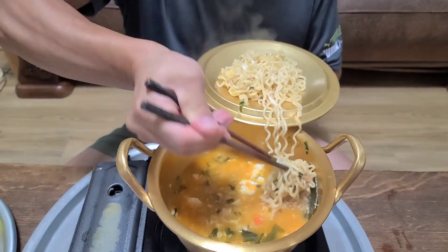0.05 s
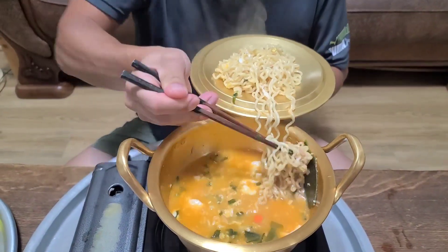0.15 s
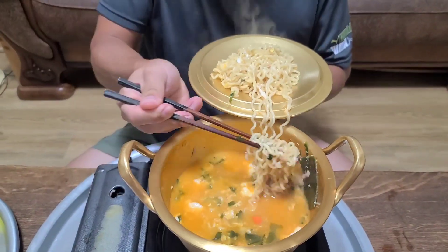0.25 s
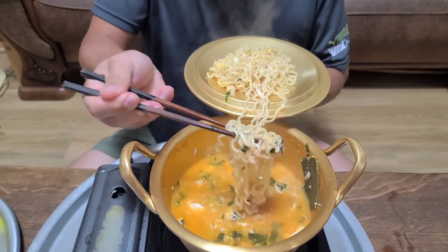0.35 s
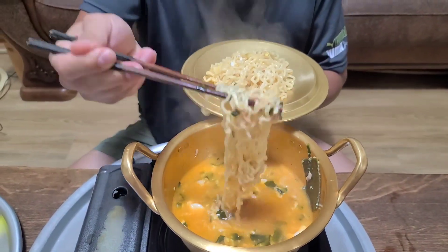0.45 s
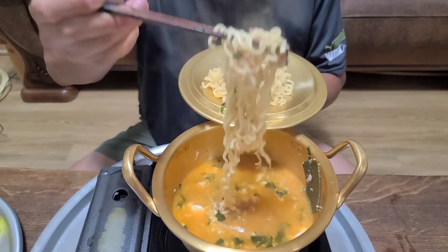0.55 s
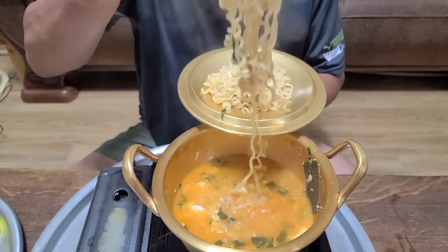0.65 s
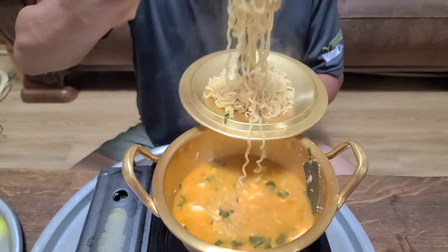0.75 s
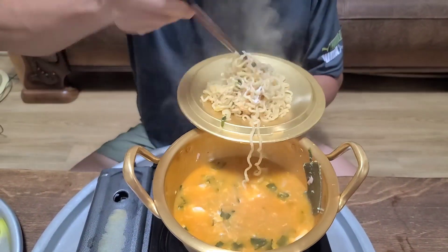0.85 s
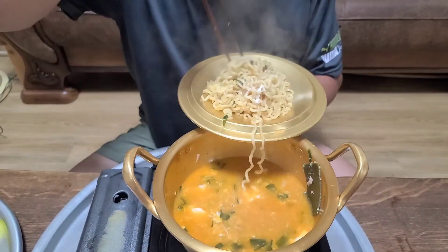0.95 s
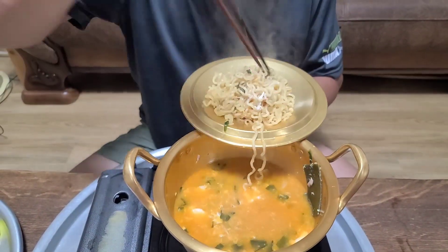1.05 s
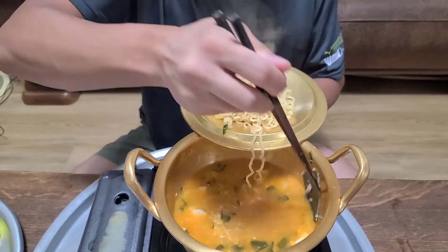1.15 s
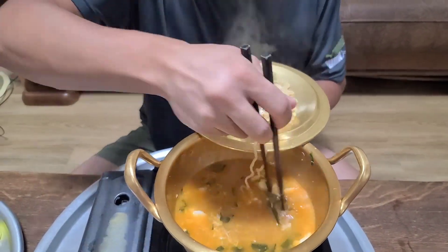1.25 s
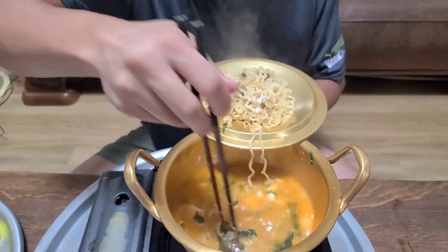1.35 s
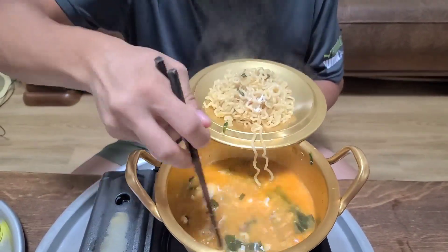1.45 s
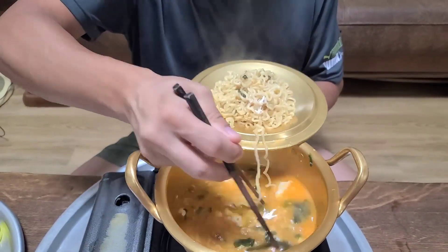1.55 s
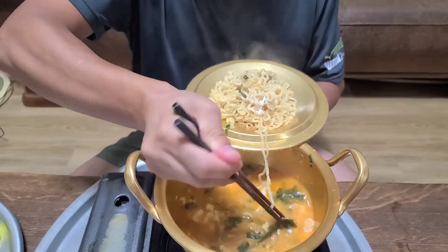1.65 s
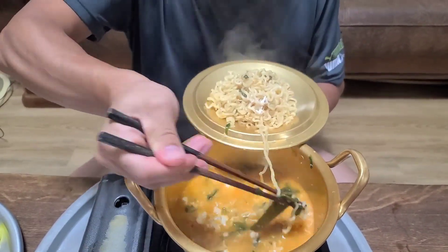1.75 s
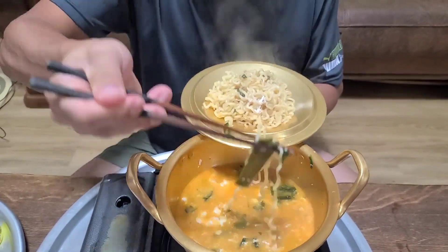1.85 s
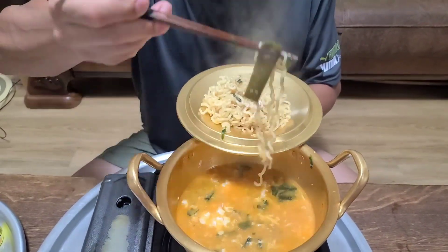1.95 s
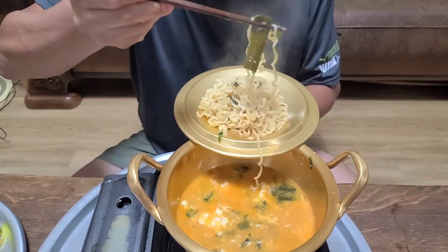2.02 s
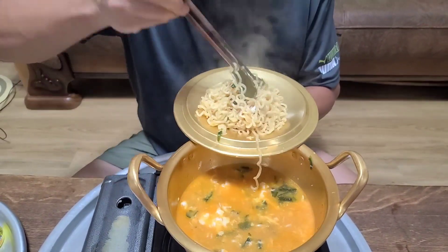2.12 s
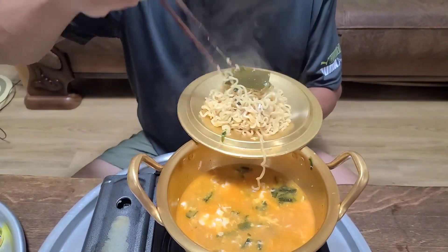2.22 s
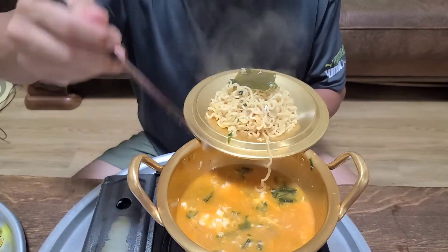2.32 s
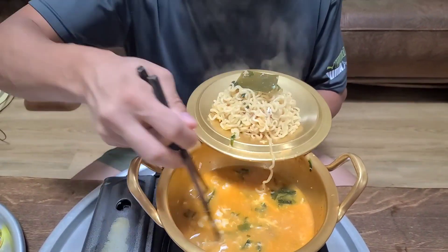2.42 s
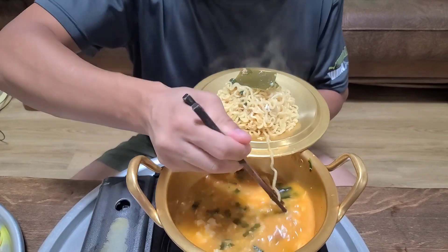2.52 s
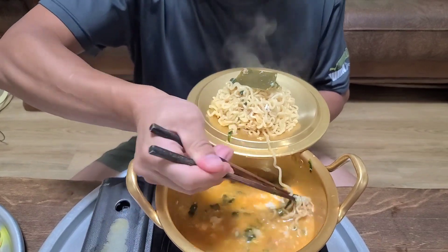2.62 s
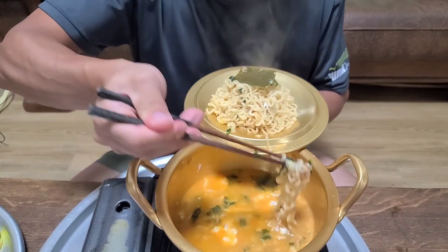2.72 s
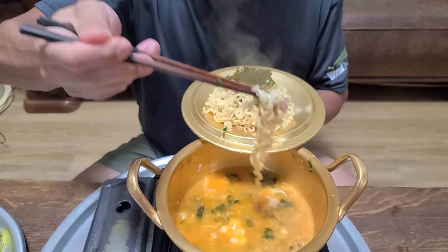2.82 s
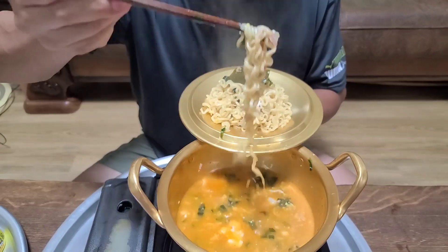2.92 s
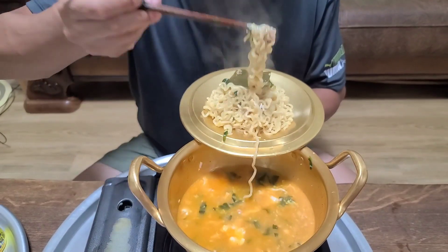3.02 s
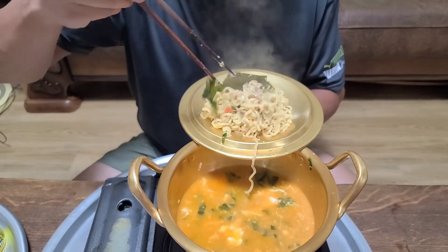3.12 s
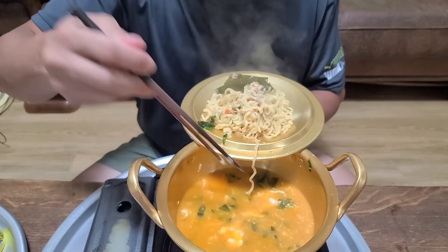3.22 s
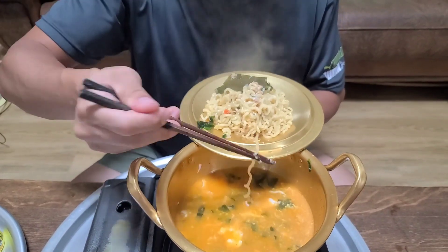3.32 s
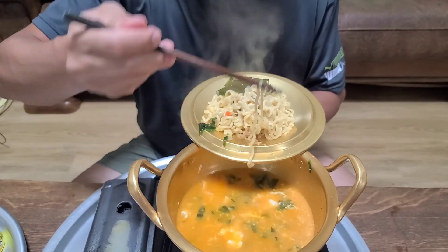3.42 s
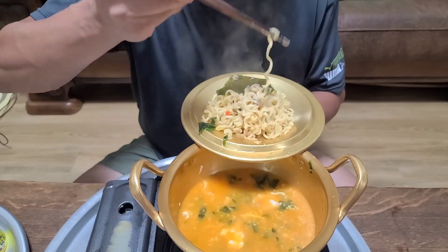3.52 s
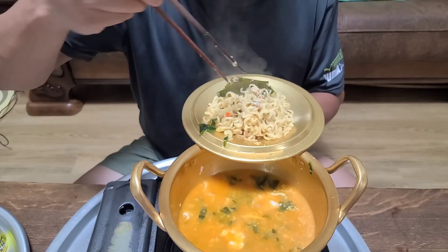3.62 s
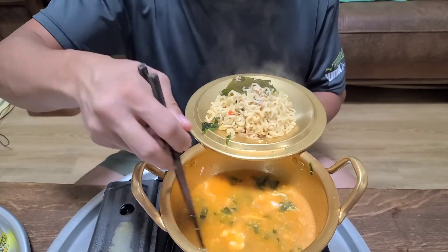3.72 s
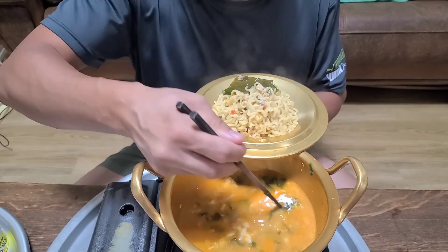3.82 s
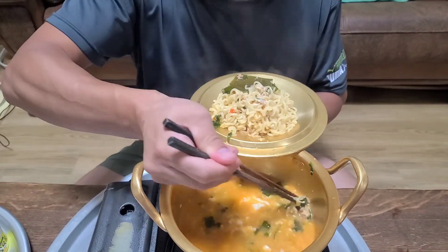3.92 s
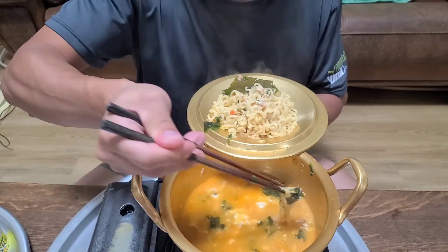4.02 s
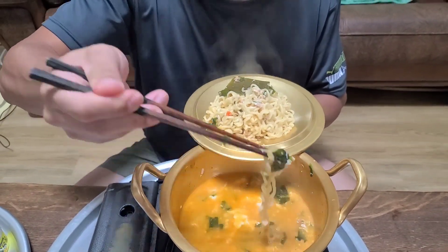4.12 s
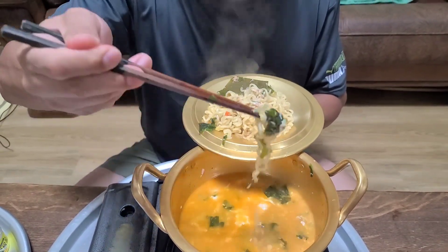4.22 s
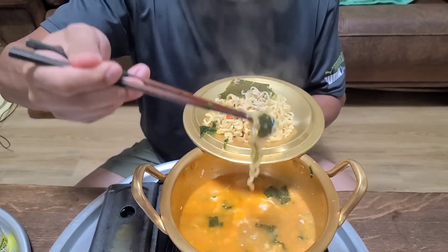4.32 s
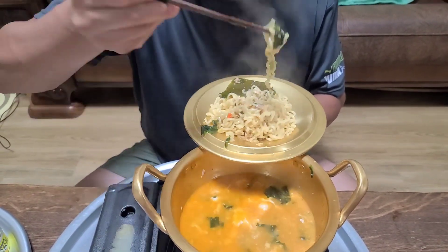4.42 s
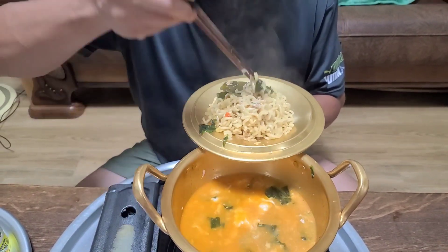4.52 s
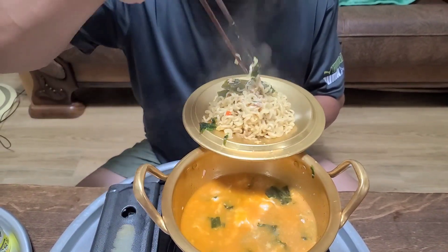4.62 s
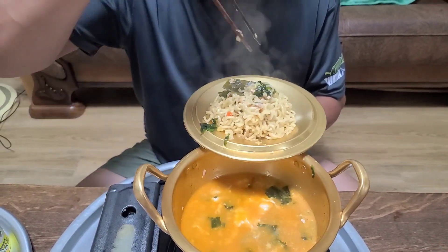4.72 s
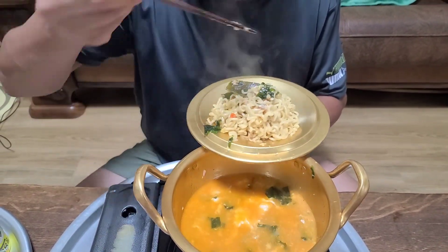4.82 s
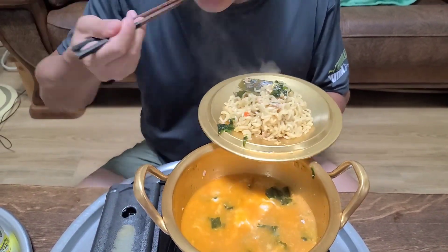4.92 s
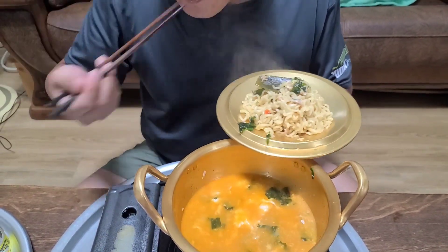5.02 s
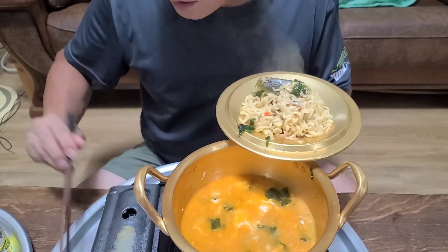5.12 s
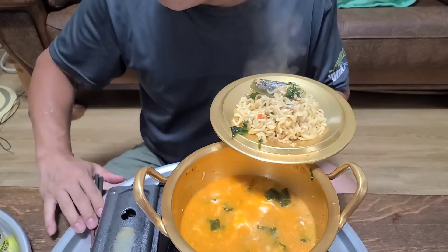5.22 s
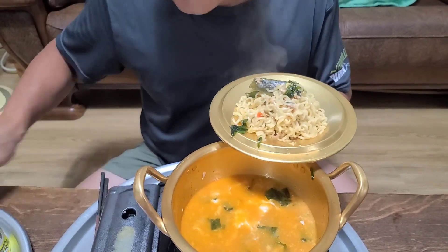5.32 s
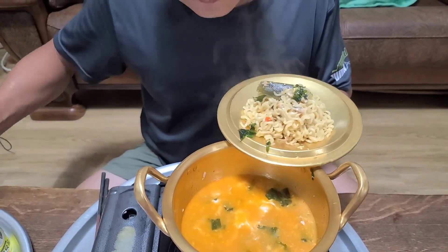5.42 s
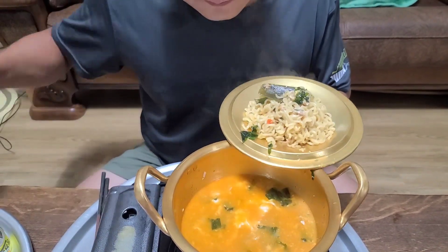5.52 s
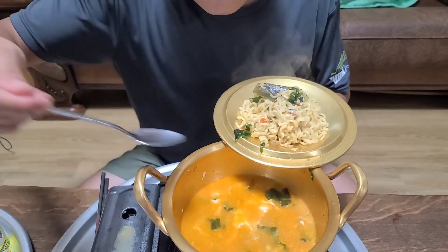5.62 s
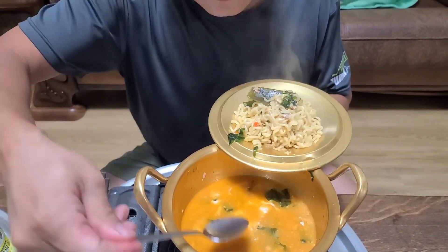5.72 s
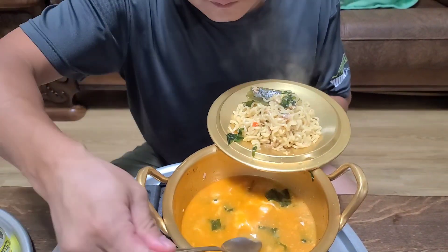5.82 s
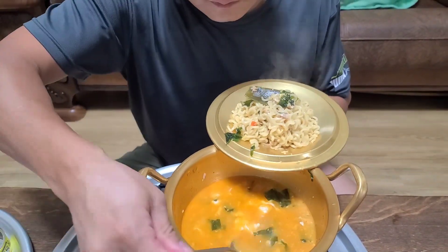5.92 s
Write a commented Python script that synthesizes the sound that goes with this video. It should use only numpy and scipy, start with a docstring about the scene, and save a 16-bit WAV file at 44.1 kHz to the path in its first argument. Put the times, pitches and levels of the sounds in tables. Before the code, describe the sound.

After a nearly silent start, wooden-sounding clicks and short, dry metallic knocks come in small groups as noodles are lifted from soup. Soft wet swishes and blipping drips sit between them. A quiet stretch follows, then chopsticks drop with a bright clatter on steel, and a spoon is picked up with a hard clink. Close stereo microphones, short room echo, soft background hiss.

```python
"""Noodles from a thin metal pot

Close stereo pair in a quiet room: chopsticks fish noodles out of soup and pile them on the pot's lid.
The tips knock on the pot, click on its rim and on each other: decaying modes with a burst of scatter.
The soup sloshes and noodles squelch as swells of grainy noise; drips are short rising tones.
At the end the chopsticks are put down on the stove's steel case and a metal spoon is picked up."""
import sys
import numpy as np
from scipy import signal
from scipy.fft import rfft, irfft
from scipy.io import wavfile
from scipy.ndimage import uniform_filter1d

SR = 44100
rng = np.random.default_rng(int(sys.argv[2]) if len(sys.argv) > 2 else 0)


def materialize(psi):
    """Save the field psi as 16-bit PCM at rate SR to the path in sys.argv[1].

    A 1-D psi becomes a single channel; in a 2-D psi each row is a channel.
    """
    bounded = np.clip(np.atleast_2d(psi).T, -1, 1)
    quanta = np.round(bounded * 32767).astype(np.int16)
    wavfile.write(sys.argv[1], SR, quanta)


N = 262395

# how the lid rings, touched or rubbed: pitch_hz, level_db (relative), t60_s
LID_MODES = [(622, -13, 0.2), (1406, -15.5, 0.13), (1220, -6, 0.018), (1630, -3.5, 0.016),
             (3660, -20, 0.049), (6200, -25, .01), (12800, -17, 0.0073)]


def amp(db):
    """Turns decibels into an amplitude factor."""
    return 10 ** (np.asarray(db) / 20)


def unit(x):
    """Scales to rms 1."""
    return x / np.sqrt(np.mean(x ** 2) + 1e-20)


def read(points, hz):
    """Joins (Hz, value) points on a log-frequency axis."""
    f, value = np.transpose(points)
    return np.interp(np.log(hz + 1), np.log(f + 1), value)


def add(mix, s, sound):
    """Lays a stereo sound into the mix at time s."""
    part = mix[:, round(s * SR):][:, :sound.shape[-1]]
    part += sound[..., :part.shape[-1]]


def colour(x, gain):
    """Filters by a gain that is a function of frequency."""
    size = x.shape[-1]
    return irfft(rfft(x) * gain(np.fft.rfftfreq(size, 1 / SR)), size)


def noise_pair(size, same):
    """Two white noises whose likeness is a function of frequency."""
    a, b = rng.standard_normal((2, size))
    shared = colour(a, lambda hz: np.sqrt((1 + np.clip(same(hz), -1, 1)) / 2))
    apart = colour(b, lambda hz: np.sqrt((1 - np.clip(same(hz), -1, 1)) / 2))
    return np.array([shared + apart, shared - apart])


def near_likeness(hz, split_hz=900):
    """Long waves reach both microphones alike, short ones do not."""
    return 1 / (1 + (hz / split_hz) ** 2)


def bands(x):
    """Splits into thud, knock, clack and tick, which add up to the whole again."""
    # borders between the four registers: edge_hz
    band_edges = [800, 2300, 5000]
    below = [colour(x, lambda hz: 1 / (1 + (hz / edge) ** 6)) for edge in band_edges]
    return np.diff([0 * x, *below, x], axis=0)


def scatter(modes, t, t60, treble_loss=0.33):
    """Nearby metal throws a blow back: a dense burst of its broad colour, the treble dying first."""
    def tint(f):
        ends = f / (f + 150) / np.hypot(1, (f / 11000) ** 2)  # softens both ends of the spectrum
        return amp(read(np.array(modes)[:, :2], f)) * ends

    burst = colour(noise_pair(len(t), near_likeness), tint)
    # t60 is that of the knock register, k = 1
    decays = [amp(-60 * t / t60 * np.exp(treble_loss * (k - 1))) for k in range(4)]
    return unit(sum(band * decay for band, decay in zip(bands(burst), decays)))


def blows(rows, modes, voice_db, contact_s, pan_db, scatter_db, scatter_t60, spread=1.235):
    """Each blow rings decaying modes, with a brief dense burst scattered behind it by nearby metal."""
    lead = SR // 200  # samples of silence ahead of the contact
    out = np.zeros((2, N))
    t = np.maximum(np.arange(SR // 4) - lead, 0) / SR
    hz, mode_db, t60 = np.transpose(modes)[:, :, None]
    register = np.arange(len(voice_db)) - (len(voice_db) - 1) / 2
    for s, db, hardness in rows:
        # every contact point detunes the modes and sends them to each microphone in another phase
        pitch = hz * (1 + 0.01 * rng.standard_normal(hz.shape))
        skew = (1 - near_likeness(hz)) * spread * rng.uniform(0.25, 0.99, hz.shape)
        skew = skew * np.where(hz < 2600, 1, -1)
        phase = rng.uniform(0, 2 * np.pi, hz.shape) + np.array([skew, -skew])
        ring = (amp(mode_db - 60 * t / t60) * np.sin(2 * np.pi * pitch * t + phase)).sum(1)
        hit = unit(ring) + amp(scatter_db) * scatter(modes, t, scatter_t60)
        # the sound builds up while the two things press together
        hit = hit * (1 - np.exp(-(t / contact_s) ** 2))
        # a harder contact tilts the voice towards the treble
        band_db = db + np.array(voice_db) + hardness * register
        # levels hold for the first 10 ms
        levelled = [amp(level) * band / np.std(band[:, lead:lead + SR // 100])
                    for level, band in zip(band_db, bands(hit))]
        add(out, s - lead / SR, sum(levelled))
    return out * amp([[pan_db / 2], [-pan_db / 2]])


def chatter(blow, gap_s, first_db, step_db, softer_db, count):
    """After a hard blow the thing chatters: uneven, duller rebounds, each weaker than the last."""
    s, db, hardness = blow
    rebounds = []
    for k in range(count):
        start = s + gap_s * (k + 1 + rng.uniform(-.25, .25))
        rebounds.append((start, db + first_db + step_db * k, hardness + softer_db))
    return rebounds


def strokes(rows, octaves, grain_db, grains_hz):
    """Short swells of grainy noise around a centre pitch."""
    out = np.zeros((2, N))
    t = np.arange(SR // 4) / SR
    for s, length, level, centre_hz in rows:
        def hump(f):
            distance = np.log2((f + 1) / centre_hz) / octaves
            return np.exp(-.5 * distance ** 2) / np.sqrt(f + centre_hz)

        flicker = colour(rng.standard_normal(len(t)), lambda f: np.exp(-(f / grains_hz) ** 2))
        hiss = noise_pair(len(t), near_likeness) * amp(grain_db * unit(flicker))
        swell = np.sin(np.pi * np.minimum(t / length, 1) ** 0.8)
        add(out, s, amp(level) * unit(colour(hiss, hump)) * swell)
    return out


# In all tables of blows, hardness_db is the gain from one register to the next;
# the level_db of a blow is the one before any group trim in scene().


def pot_wall_taps():
    """The tips tap the thin wall, whose many modes die within hundredths of a second."""
    # tips on the wall: start_s, level_db, hardness_db
    taps = [(1.1615, -40.5, 0), (2.1036, -46.5, .5), (3.1418, -41.5, 2.5), (3.4465, -42, 2.5),
            (3.5125, -52.5, 0.2), (3.6905, -46, .9), (3.824, -56.5, -3), (3.896, -56.5, 0),
            (4.372, -50, -2.5), (4.3808, -46.5, 4)]
    # ringing of the pot: pitch_hz, level_db (relative), t60_s
    modes = [(415, -4, 0.058), (492, -3, 0.059), (727, -9, 0.026), (878, -5.5, 0.024), (1223, -0.5, 0.018),
             (1675, 1, 0.03), (2883, -10, 0.048), (3277, -5.5, 0.02), (3753, -2, 0.014), (4620, -7, 0.012),
             (5350, -13, 0.022), (6310, -5, 0.0091), (7500, -5, 0.0072), (9000, -12.5, 0.0079),
             (10760, -15.5, .008), (13200, -14.5, 0.0089)]
    # strength by register: thud_db, knock_db, clack_db, tick_db
    voice_db = (-2.6, 0.5, -0.5, -9.5)
    return blows(taps, modes, voice_db, contact_s=0.0012, pan_db=-1, scatter_db=-4.5, scatter_t60=0.046)


def pot_bottom_knocks():
    """Both tips strike the bottom, which the soup muffles; the second comes later and more softly."""
    # first tip on the bottom: start_s, level_db, hardness_db
    knocks = [(1.427, -54.5, -0.5), (1.5505, -37.5, -0.3), (2.492, -47.5, -3), (2.5115, -43.5, 0),
              (2.7658, -36, 1.1)]
    # ringing of the bottom under soup: pitch_hz, level_db (relative), t60_s
    modes = [(203, -14.5, 0.049), (398, -7, 0.039), (469, -1.5, 0.053), (560, -10, 0.025), (716, -4, 0.021),
             (926, -9.5, 0.018), (1150, -9, 0.028), (1550, -10.5, 0.011), (2030, -15.5, 0.017),
             (3560, -22, 0.019), (6130, -10, 0.017)]
    # strength by register: thud_db, knock_db, clack_db, tick_db
    voice_db = (2, -6.5, -15.5, -24.5)
    second_s, second_db = .0065, -7
    second_tip = [(s + second_s, db + second_db, hardness) for s, db, hardness in knocks]
    return blows(knocks + second_tip, modes, voice_db, contact_s=0.00087, pan_db=0.8,
                 scatter_db=1.0, scatter_t60=0.029)


def rim_taps():
    """The shafts click on the bare rim; the first blow rattles on in weaker rebounds."""
    # shafts on the rim: start_s, level_db, hardness_db
    taps = [(2.4601, -28, 1.5), (2.5385, -57.5, 5.5), (3.1613, -35.5, -1)]
    # ringing of the rim: pitch_hz, level_db (relative), t60_s
    modes = [(250, -19, 0.049), (532, -7.5, 0.041), (1196, -3.5, 0.029), (1436, 0.5, 0.025),
             (2940, -1, 0.027), (3630, 4, 0.012), (4240, 4, 0.013), (4760, -2.5, 0.01), (5530, -2.5, 0.01),
             (6380, -6.5, 0.01), (7000, -5.5, 0.0073), (8900, -8.5, 0.0068), (10700, -14, .008),
             (11850, -15.5, 0.011)]
    # strength by register: thud_db, knock_db, clack_db, tick_db
    voice_db = (-10, -.5, -3, -3.5)
    rattling = chatter(taps[0], gap_s=.0105, first_db=-18, step_db=-2.5, softer_db=-7, count=3)
    return blows(taps + rattling, modes, voice_db, contact_s=0.00066, pan_db=-0.6,
                 scatter_db=-5, scatter_t60=0.033)


def lid_edge_graze():
    """A shaft grazes the thin edge of the lid and excites its bright modes."""
    # shaft on the edge: start_s, level_db, hardness_db
    grazes = [(1.4828, -44.5, 0)]
    # ringing of the edge: pitch_hz, level_db (relative), t60_s
    modes = [(1330, -5, 0.079), (3600, 1, 0.023), (4700, -7.5, 0.028), (6430, 3, 0.015), (7000, -4, 0.0085),
             (8750, -10, .01), (12000, -19, .008)]
    # strength by register: thud_db, knock_db, clack_db, tick_db
    voice_db = (-19, -5.5, -4, 2)
    return blows(grazes, modes, voice_db, contact_s=0.00095, pan_db=-0.5, scatter_db=0.5, scatter_t60=0.017)


def chopstick_pinches():
    """One chopstick clicks on the other, both held in the hand."""
    # chopstick on chopstick: start_s, level_db, hardness_db
    clicks = [(.7153, -47, 1.5), (.732, -62, 0), (1.289, -56, -0.25), (3.3362, -42.5, -0.26),
              (4.32, -62.5, 0.71), (4.976, -63, -0.83)]
    # ringing of a held chopstick: pitch_hz, level_db (relative), t60_s
    modes = [(1200, -8, 0.034), (1735, -5.5, 0.023), (3060, -10, .012), (4070, -9.5, 0.0078),
             (5580, -14, 0.016), (6340, -6, 0.011), (7200, -8, 0.0077), (8040, -7.5, 0.014),
             (11600, -14.5, .01)]
    # strength by register: thud_db, knock_db, clack_db, tick_db
    voice_db = (-13, -12.5, -3, 0)
    return blows(clicks, modes, voice_db, contact_s=0.00093, pan_db=-0.5, scatter_db=-4.0, scatter_t60=.016)


def lid_touch():
    """The lid is touched once; a short contact starts its modes."""
    # touch on the lid: start_s, level_db, hardness_db
    touches = [(3.025, -44, 0)]
    # strength by register: thud_db, knock_db, clack_db, tick_db
    voice_db = (-1, -1.5, -20, -11.5)
    return blows(touches, LID_MODES, voice_db, contact_s=0.00031, pan_db=0, scatter_db=-12, scatter_t60=0.013)


def noodle_on_lid_edge():
    """A noodle dragged over the lid's edge makes its lowest mode sing, a very narrow band of noise."""
    start_s, length_s, level_db = 3.38, .09, -60
    lowest_hz = LID_MODES[0][0]
    return strokes([(start_s, length_s, level_db, lowest_hz)], octaves=.04, grain_db=4.0, grains_hz=150)


def drips(glide=0.04, cycles=2.9):
    """Each drip is a few cycles of a bubble whose pitch creeps up."""
    # drips and small bubbles: peak_s, pitch_hz, peak_db
    bubbles = [(.945, 790, -53.5), (2.513, 1240, -37.5), (2.584, 3370, -53.5), (2.6001, 1320, -39.5),
               (2.614, 1190, -45.5), (2.625, 1000, -45.5), (2.70, 1260, -51), (3.338, 1710, -28),
               (3.873, 1600, -43), (5.092, 1290, -54), (5.4, 1430, -42)]
    out = np.zeros((2, N))
    for s, hz, db in bubbles:
        length = cycles / hz  # time in s from the peak to 1/e of it, on either side
        u = np.arange(-np.pi, np.pi, 1 / (length * SR))
        phase = 2 * np.pi * hz * length * (u + glide * u ** 2) + rng.uniform(0, 1, (2, 1))
        swell = amp(db) * np.exp(-u ** 2)
        add(out, s - np.pi * length, swell * np.sin(phase))
    return out


def sloshes():
    """Wet noodles dragged through the soup and over the lid: broad swells of grainy noise."""
    # drags: start_s, length_s, level_db, centre_hz
    drags = [(1.18, .28, -63, 2100), (1.56, .17, -59.5, 1700), (2.23, .18, -61.5, 3400),
             (2.52, 0.11, -58.5, 503), (3.23, 0.053, -62.5, 2600), (3.895, 0.047, -59, 2190),
             (4.08, 0.077, -60, 2010)]
    return strokes(drags, octaves=1.3, grain_db=3.8, grains_hz=140)


def squelches_and_rim_ringing():
    """Short narrow-band swells: noodles squelching, and at 2.538 s the ringing after a rim tap."""
    # squelches and the one ringing: start_s, length_s, level_db, centre_hz
    swells = [(.43, 0.075, -66, 1550), (.59, 0.15, -66.5, 1180), (1.265, 0.024, -57, 1280),
              (2.538, 0.03, -54, 3660), (2.749, .02, -49, 550), (3.79, 0.039, -61, 1350),
              (5.02, 0.028, -62, 1260)]
    return strokes(swells, octaves=0.24, grain_db=2.5, grains_hz=150)


def tip_touches():
    """The tips touch the stove and the loosely held chopsticks ring."""
    # tips on the stove: start_s, level_db, hardness_db
    touches = [(5.206, -54.5, 1.4), (5.2588, -32.5, 0.52), (5.268, -31.5, -1.3)]
    # ringing of a loose chopstick: pitch_hz, level_db (relative), t60_s
    modes = [(188, -21, .05), (1423, -6, 0.03), (2350, -2, .012), (2620, -4, 0.03), (3600, -0.5, 0.016),
             (4000, -2.5, 0.015), (5300, -7, .014), (6800, -11.5, 0.013), (8900, -17, 0.0086)]
    # strength by register: thud_db, knock_db, clack_db, tick_db
    voice_db = (-15, -5.5, -1.5, -7)
    return blows(touches, modes, voice_db, contact_s=.0006, pan_db=-.5, scatter_db=-6, scatter_t60=0.026)


def chopstick_drops():
    """Both shafts fall flat on the stove's steel case, which rings while they settle in rebounds."""
    # shafts on the stove: start_s, level_db, hardness_db
    drops = [(5.3148, -20.5, -0.4), (5.3184, -23, .8)]
    # ringing of the steel case: pitch_hz, level_db (relative), t60_s
    modes = [(203, -14, 0.039), (389, -8, 0.056), (536, -8, 0.04), (1191, -10, .04), (1880, 0.5, 0.021),
             (2070, -5.5, 0.0193), (2270, -12.5, 0.038), (2530, -3, .025), (2760, 2, 0.023),
             (3120, -14, .03), (3600, 2, 0.031), (3780, -8, .02), (4100, -4, 0.028), (4520, -4.5, 0.019),
             (5080, -9, 0.013), (5590, -11, 0.018), (7260, -20, 0.017), (10900, -21.5, .015)]
    # strength by register: thud_db, knock_db, clack_db, tick_db
    voice_db = (-11, -6, 0, -10.5)
    settling = chatter(drops[-1], gap_s=.011, first_db=-16.5, step_db=-4.5, softer_db=-4.5, count=4)
    return blows(drops + settling, modes, voice_db, contact_s=0.00035, pan_db=.5,
                 scatter_db=-2.0, scatter_t60=.023)


def spoon_knocks():
    """The metal spoon knocks as it is picked up and jiggles after its hardest knock."""
    # spoon knocks: start_s, level_db, hardness_db
    knocks = [(5.8005, -45.5, 1.5), (5.8103, -41.5, 1), (5.8453, -28.5, 2.6)]
    # ringing of the spoon: pitch_hz, level_db (relative), t60_s
    modes = [(444, -4.5, 0.048), (555, -7, 0.053), (1220, 0, 0.027), (2110, -3, 0.024), (2740, 0, 0.027),
             (3020, 6.5, 0.022), (3940, 2, 0.014), (4120, -6, 0.01), (5500, -16, 0.019),
             (6620, -17.5, 0.017), (8960, -23, 0.013)]
    # strength by register: thud_db, knock_db, clack_db, tick_db
    voice_db = (-1.5, 1, -2.5, -6)
    jiggling = chatter(knocks[2], gap_s=.0085, first_db=-17, step_db=-3.5, softer_db=-4.5, count=5)
    return blows(knocks + jiggling, modes, voice_db, contact_s=0.00076, pan_db=-0.3,
                 scatter_db=-1.5, scatter_t60=0.033)


def spoon_ring(start=5.85, t60=1.0, width_hz=35):
    """The spoon is drawn off the table: friction keeps its modes singing unevenly."""
    # tones of the sliding spoon: pitch_hz, level_db (rms at the start)
    tones = [(452, -70), (619, -67), (1265, -52.5), (1798, -58), (2121, -65), (2600, -72), (3068, -63),
             (3289, -59), (3784, -61), (5566, -70), (6401, -72)]
    out = np.zeros((2, N))
    t = np.arange(SR // 2) / SR
    friction = noise_pair(len(t), near_likeness)
    for hz, level in tones:
        tone = unit(colour(friction, lambda f: 1 / (1 + ((f - hz) / width_hz) ** 2)))
        add(out, start, amp(level - 60 * t / t60) * tone)
    return out


def rubs():
    """Hand and cutlery brush over the stove and table: broad swells of finer grains."""
    # brushes: start_s, length_s, level_db, centre_hz
    brushes = [(5.51, 0.056, -59.5, 2310), (5.62, 0.088, -62, 2700), (5.86, .12, -54.5, 2980)]
    return strokes(brushes, octaves=1.2, grain_db=3.0, grains_hz=300)


def hand_thump_and_spoon_scrape():
    """A low hand thump, then a short spoon scrape, both in a narrow band of noise."""
    # thump, then scrape: start_s, length_s, level_db, centre_hz
    thump_and_scrape = [(5.443, 0.021, -47.5, 221), (5.511, 0.017, -47, 2340)]
    return strokes(thump_and_scrape, octaves=0.33, grain_db=-0.5, grains_hz=300)


def room(x, delay=0.0041):
    """A furnished room: a short diffuse tail that builds up over a few ms, its treble cut."""
    # decay of the room: pitch_hz, t60_s
    room_t60 = [(150, 0.11), (500, 0.12), (1500, .12), (3600, 0.12), (9000, 0.11)]
    tail_db = [(400, 5.0), (1500, 3.0), (4000, -3.0), (7000, -1.0)]  # pitch_hz, gain_db
    hz, t, z = signal.stft(noise_pair(SR // 3, near_likeness), SR, nperseg=256)
    decay = amp(-60 * t / read(room_t60, hz)[:, None])
    tail = signal.istft(z * decay, SR, nperseg=256)[1]
    tail = tail * (1 - np.exp(-(np.arange(tail.shape[1]) / SR / delay) ** 4))
    tail = colour(tail / np.linalg.norm(tail[0]), lambda f: amp(read(tail_db, f)))
    return signal.fftconvolve(x, tail, axes=1)[:, :N]


def room_air():
    """Soft room hiss: noise whose likeness at the two microphones depends on pitch."""
    # spectrum of the hiss: pitch_hz, density_db (relative, per Hz)
    spectrum = [(15, -61), (25, -21), (108, -4.5), (157, -12.5), (317, -17.5), (416, -17), (641, -19),
                (840, -23), (911, -25.5), (1840, -21), (2840, -30), (6740, -30.5), (7920, -37.5),
                (13600, -41.5), (16000, -40.5)]
    # left-right likeness of the hiss: pitch_hz, likeness (-1 to 1)
    likeness = [(60, 0.98), (180, 0.92), (550, 0.45), (1650, 0.011), (4970, -0.17), (15000, 0.23)]
    level_db = -65.5  # of the two channels' mean above 200 Hz
    air = colour(noise_pair(N, lambda hz: read(likeness, hz)), lambda hz: amp(read(spectrum, hz)))
    return amp(level_db) * air / np.std(colour(air.mean(0), lambda hz: hz > 200))


def appliance_hum():
    """The unsteady low drone of an appliance: a narrow band of noise, alike in both channels."""
    centre_hz, width_hz, level_db = 108.7, 14, -69
    hum = colour(rng.standard_normal(N), lambda hz: np.exp(-((hz - centre_hz) / width_hz) ** 2))
    return amp(level_db) * unit(hum)


def scene():
    """Mixes pot, noodles, soup, cutlery and hand with the room's echo and background."""
    fishing = amp(-1.23) * (pot_wall_taps() + pot_bottom_knocks() + rim_taps() + lid_edge_graze())
    pinches = chopstick_pinches()
    lid = lid_touch()
    soup_and_ringing = drips() + sloshes() + squelches_and_rim_ringing()
    cutlery = amp(-1.53) * (tip_touches() + chopstick_drops() + spoon_knocks())
    handling = rubs() + spoon_ring() + hand_thump_and_spoon_scrape()
    echo = room(amp(-14.5) * fishing + amp(-13) * cutlery + amp(-14) * (soup_and_ringing + lid + pinches))
    near = fishing + pinches + lid + noodle_on_lid_edge() + soup_and_ringing + cutlery + handling
    return near + echo + room_air() + appliance_hum()


def record(dry):
    """The sound drops out once for an instant; the microphone dips narrowly in the treble; a band limit."""
    # the silent instant: start_s, end_s
    dropout = (1.522, 1.548)
    t = np.arange(N) / SR
    live = 1. * ((t < dropout[0]) | (t > dropout[1]))
    live = uniform_filter1d(live, size=90)  # 2 ms fades
    dipped = colour(dry * live, lambda hz: amp(-8 * np.exp(-((hz - 8050) / 350) ** 2)))
    low_pass = signal.firwin(511, 16000, window=("kaiser", 9), fs=SR)  # cutoff in Hz
    return signal.oaconvolve(dipped, low_pass[None], "same")


dry = scene()
out = record(dry)
materialize(out)
```